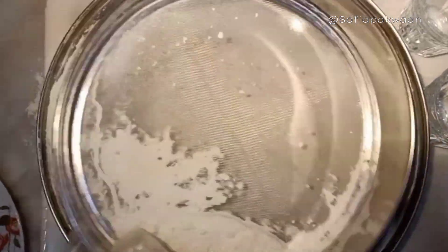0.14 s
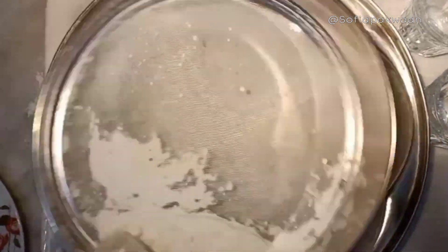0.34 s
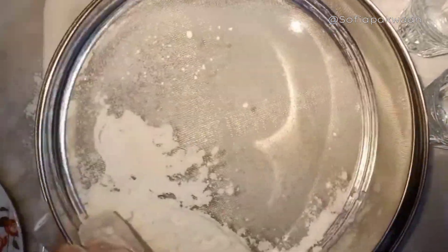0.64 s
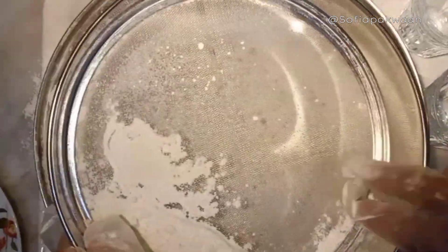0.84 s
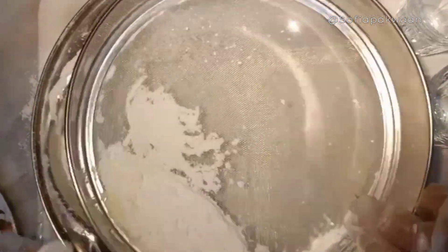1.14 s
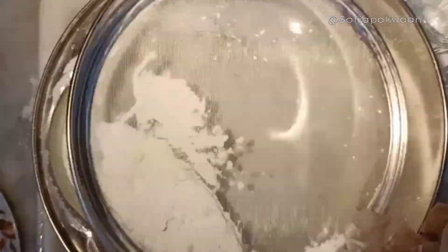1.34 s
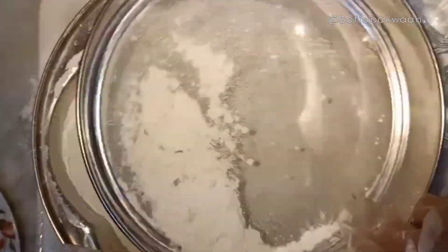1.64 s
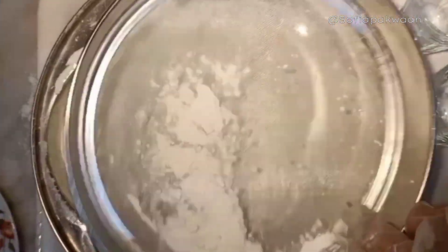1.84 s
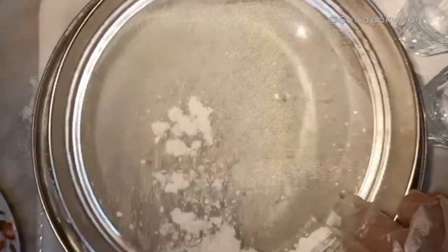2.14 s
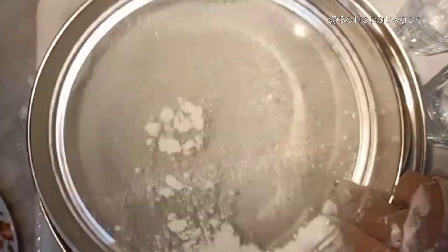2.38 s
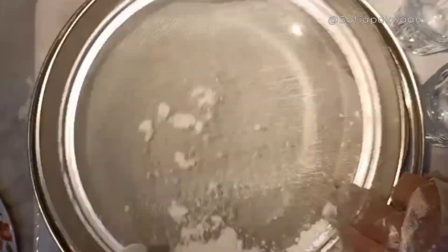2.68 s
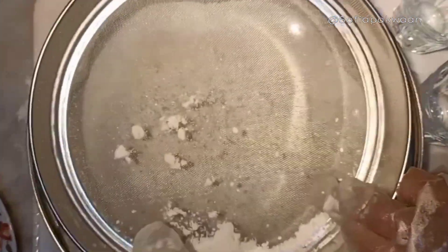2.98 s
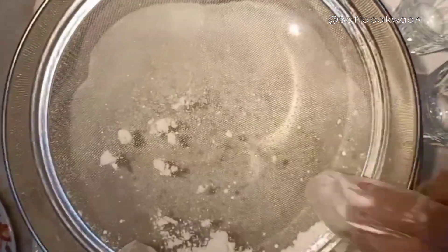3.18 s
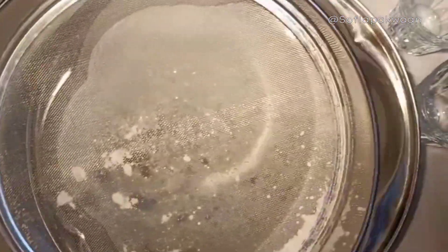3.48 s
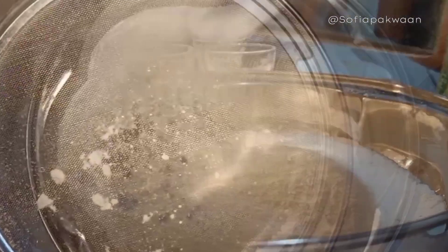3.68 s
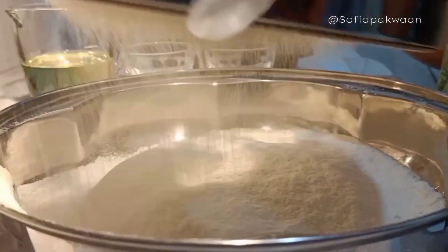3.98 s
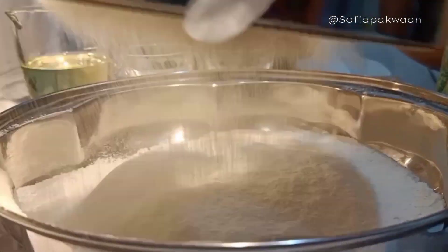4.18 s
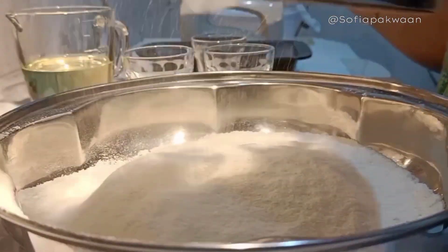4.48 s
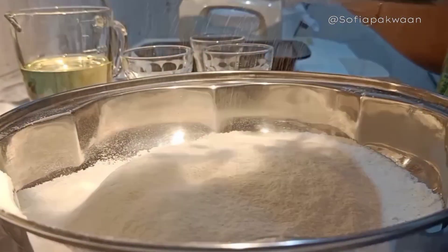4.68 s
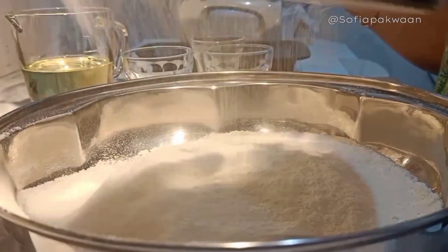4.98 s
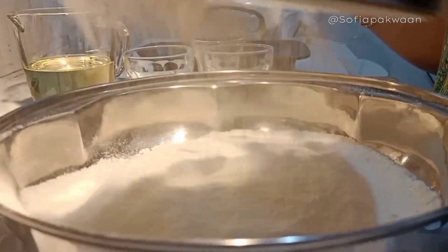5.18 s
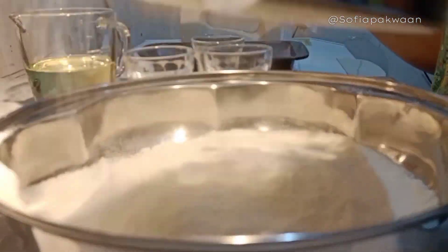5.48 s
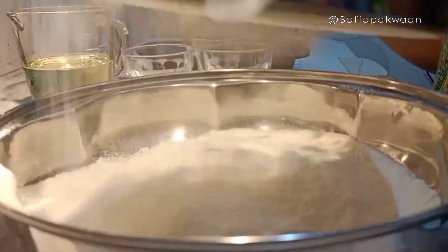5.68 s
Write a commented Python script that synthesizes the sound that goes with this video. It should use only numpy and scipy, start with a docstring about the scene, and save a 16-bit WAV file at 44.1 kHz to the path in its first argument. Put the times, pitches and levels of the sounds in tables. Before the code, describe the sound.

Close recording in a small hard-walled kitchen: flour sifting with a dry, bright, pulsing hiss, tiny metallic ticks and brief dull finger scuffs. The steel rim strikes the bowl softly at first, then loudly just after one second, again near two, and last at two and three-quarters. Then the sifting turns distant and much quieter, soft quick puffs over a low hum.

```python
"""A steel flour sieve is shaken over a steel bowl: its rim knocks the bowl and both ring in decaying modes.
Flour hisses across the mesh, as noise coloured by broad rings that swells with each stroke.
Lumps tick as short ringing scrapes and fingers shift on the rim as clumpy friction noise.
A small hard-walled kitchen answers knocks and ticks with sparse reflections;
under it all lie lumpy low room noise, fuzzy low tones and a wavering appliance hum."""
import sys
import numpy as np
from scipy import signal
from scipy.fft import rfft, irfft
from scipy.io import wavfile
from scipy.ndimage import uniform_filter1d

SR = 44100
rng = np.random.default_rng(int(sys.argv[2]) if len(sys.argv) > 2 else 0)


def generate_wav(sig):
    """Save sig (samples, or channels by samples) to the path in sys.argv[1] as 16-bit PCM at SR."""
    pcm = np.round(np.clip(np.atleast_2d(sig).T, -1, 1) * 32767).astype(np.int16)
    wavfile.write(sys.argv[1], SR, pcm)


def voltage_ratio(decibels):
    """Convert decibels (scalar or array-like) to amplitude ratios, 20 dB per decade."""
    exponent = np.asarray(decibels, float) / 20
    return 10 ** exponent


N = 257103  # length in samples

# spectrum of the kitchen background: frequency_hz, relative_density_db
AIR_SPECTRUM = [(24, -44), (40, -15.5), (64, -16.5), (85, -26), (118, 11.5), (140, -4.5), (206, -6.5),
                (304, -5.5), (596, -18.5), (897, -18), (1420, -24.5), (2200, -25.5), (3500, -20.5),
                (4700, -50), (15800, -73.5)]
# level of the kitchen background: time_s, level_db
AIR_LEVEL = [(0, -50.5), (.45, -67.5), (.75, -65), (2.35, -61), (2.62, -67.5), (3.1, -61.5), (4.5, -67),
             (5.83, -67)]
# fuzzy low tones in the room noise: pitch_hz, level_against_noise_db, width_hz
DRONE_TONES = [(118.6, -10.5, 2.7), (145, -9.5, 11)]
# repeating waver of the hum, before its slow sag: share_of_cycle, level_db
HUM_WAVER = [(0, -87.5), (0.102, -71.5), (0.221, -60.5), (.58, -79.5), (.78, -66.5), (1, -84)]
HUM_HZ, HUM_CYCLE_S, HUM_START_S, HUM_SAG_DB_PER_S = 57, 2.04, 0.53, 1.35
# low rumble after each blow, relative to the blow's low part
BOOM_DB, BOOM_RISE_S, BOOM_FALL_S = -28.5, 0.01, 0.02

# reverberation of the kitchen: frequency_hz, t60_s
KITCHEN_DECAY = [(250, 0.23), (800, 0.43), (2000, 0.54), (4000, 0.46), (7000, 0.44), (12000, 0.42)]
# microphone colour for close, sharp sounds: frequency_hz, gain_db
MIC_COLOUR = [(60, -42.5), (200, -10), (450, -1), (1000, -4.5), (7000, 0), (9000, -13), (12000, -23.5),
              (15400, -23)]

# fingers shifting their grip on the rim: peak_s, peak_level_db, fall_db_per_s
GRIP_SHIFTS = [(0.794, -58.5, 504), (.862, -60, 103), (1.0, -54.5, 200), (2.274, -55, 500),
               (2.444, -63.5, 298), (2.68, -73, 200)]
# spectrum of skin on steel: frequency_hz, relative_density_db
GRIP_SPECTRUM = [(250, -24), (550, -1), (1300, -2), (2200, -19.5), (5000, -36)]
GRIP_RISE_DB_PER_S = 403

# lumps and fingers on mesh and rim: start_s, relative_peak_db, pitch_hz
LUMP_TICKS = [(0.5925, -47, 3100), (0.702, -34, 3800), (0.7332, -40.5, 3880), (0.8018, -35, 3226),
              (0.8562, -29.5, 6590), (0.8763, -38, 3050), (0.9065, -30.5, 3515), (0.9537, -37, 6750),
              (0.9787, -36, 3160), (1.0006, -33, 2490), (1.091, -35.5, 6300), (1.1124, -42, 2150),
              (3.113, -45.5, 2630), (3.168, -44.5, 3280), (3.2503, -37.5, 3380), (3.273, -42, 3110),
              (3.407, -49, 3524), (3.7811, -39.5, 3720)]

# bouts of shaking: first_stroke_s, last_stroke_s, stroke_interval_s, first_swell_db, last_swell_db
SHAKING_BOUTS = [(0.131, .6, .094, 4, 3.5), (1.6, 1.85, 0.081, 4.5, 6.5), (2.144, 2.56, 0.15, 4, 3),
                 (3.79, 4.185, 0.1, 8, 9), (4.289, 4.393, 0.091, 3, 3.5), (4.698, 5.192, 0.098, 6, 6.5),
                 (5.29, 5.4, .105, 4.5, 5.5), (5.584, 5.78, 0.0985, 5, 8.5)]
# single flicks of the sieve: centre_s, swell_db
FLICKS = [(3.119, 4.5), (3.275, 2), (3.587, 4.5), (3.713, 5), (4.505, 5), (4.59, 1), (5.14, 5.5)]
# brief dips of the hiss: centre_s, swell_db
HISS_DIPS = [(4.455, -6.5), (4.645, -8), (5.45, -4.5)]
# offset of every second stroke; random spread; time from a swell's centre to 1/e of its dB height
BACK_DB, UNEVEN_DB, SWELL_S = -0.5, 0.96, 0.023

# flour sliding on the mesh, before the swells: time_s, level_db, extra_body_below_4_khz_db
FLOUR_LEVEL = [(0, -56, 4), (0.6, -55.5, -3), (.68, -65.5, 0.5), (.85, -60, -2), (.92, -61, 5),
               (1.1, -59.5, 1), (1.15, -67, -5), (1.37, -57, 5), (1.43, -51, -2.5), (1.9, -54, -2.5),
               (2.7, -53, -2), (2.85, -52, 5.5), (3.1, -70, 4.5), (3.35, -73, -2.5), (3.45, -84, 10),
               (3.74, -80, 3), (3.799, -72.5, 2), (4.6, -74, 0.5), (5.83, -71.5, -0.5)]
# spectrum of flour on mesh: frequency_hz, relative_density_db
MESH_SPECTRUM = [(530, -57), (900, -15.5), (1120, -15.5), (1680, -23.5), (2030, -4), (2620, -3.5),
                 (2950, 0.5), (4080, -9.5), (4540, -9.5), (6130, -8), (6740, -3.5), (7880, -15.5),
                 (9660, -25.5), (14000, -32), (15800, -30.5)]
# broad rings of the mesh: centre_hz, width_hz, boost_db
MESH_RINGS = [(2950, 170, 2), (4020, 300, 10.5), (6750, 840, 3)]
# fuller hiss around 5 kHz in the later, more distant shaking, one row: from_s, centre_hz, width_hz, boost_db
LATER_COLOUR = (3.2, 5350, 1800, 3)
# treble gain in dB per dB of flour level over the neutral level; blotchiness of the spectrum
BRIGHTER, NEUTRAL_DB, BLOTCH_DB = 0.4, -59.5, 1.6

# rim on bowl, clangs and dull bounces:
# start_s, below_1_khz_db, near_2_khz_db, near_4_khz_db, favoured_mode_hz
RIM_KNOCKS = [(0.0, -23.5, -27, -25, 3760), (0.01, -27.5, -21.5, -33, 1940), (.042, -17, -24, -27, 750),
              (0.051, -23, -22.5, -35.5, 1480), (0.057, -46, -48, -45, 932), (0.15, -23, -36, -31.5, 750),
              (.166, -44, -48, -56, 932), (0.159, -31, -28.5, -52, 1480), (1.14, -12.5, -9, -11.5, 1896),
              (1.165, -16.5, -12, -21, 820), (1.229, -25, -32, -29.5, 920),
              (1.579, -26.5, -26, -29.5, 1980), (1.708, -34, -46.5, -39, 750),
              (1.743, -41.5, -37, -42, 830), (1.943, -17.5, -12.5, -12.5, 2150),
              (1.959, -24, -20.5, -30, 2050), (1.974, -13.5, -19, -31.5, 840),
              (2.746, -18, -14.5, -17, 2050), (2.794, -29, -36, -38, 867)]
# modes of sieve and bowl, damped by hand and flour: pitch_hz, relative_level_db, t60_s (before further damping)
STEEL_MODES = [(297, -17.5, 0.15), (552, -9.5, 0.042), (620, -9.5, 0.057), (750, -4.5, 0.015),
               (818, -12, .42), (932, -2, 0.02), (1144, -11, 0.0539), (1215, -11.5, 0.05),
               (1370, -14, 0.18), (1480, -9, 0.02), (1679, -11, 0.18), (1964, -6.5, 0.025),
               (1980, -13.5, 0.013), (2050, -11.5, 0.18), (2171, -13, 0.14), (2282, -9, 0.026),
               (2450, -9.5, 0.02), (2634, -10, 0.047), (2704, -13, 0.07), (2962, -7, 0.1),
               (3273, -8.5, 0.082), (3650, -12, 0.034), (3880, -5, 0.05), (4266, -5.5, 0.015),
               (4250, -4.5, 0.043), (4770, -13, 0.067), (5523, -24, 0.031), (5450, -8.5, 0.024),
               (6350, -2.5, .04), (6936, 1.5, 0.034), (6960, -8.5, 0.024)]
TOP_DROP_DB = 14  # a blow's colour at 6500 Hz and above lies this far under that at 3500 Hz
OFF_SPOT_DB = -10  # long-ringing modes lose up to this much away from the struck spot
SPOT_LONGER = 0.92  # a short mode at the struck spot rings this share longer

EDGE_HZ = 15550  # upper band limit


def evened(x):
    """Normalization: scales a signal to rms 1."""
    return x / np.sqrt(np.mean(x ** 2) + 1e-20)


def read(points, hz):
    """Interpolation: reads a curve on a log-frequency axis."""
    f, value = np.transpose(points)
    return np.interp(np.log(hz + 1), np.log(f + 1), value)


def add(mix, s, sound):
    """Superposition: mixes a sound in at time s."""
    part = mix[max(round(s * SR), 0):][:len(sound)]
    part += sound[:len(part)]


def shaped(x, size, field_db):
    """Time-varying filtering: colours x by a dB field over frequency and time."""
    overlap = size * 3 // 4
    hz, t, z = signal.stft(x, SR, nperseg=size, noverlap=overlap)
    z = z * voltage_ratio(field_db(hz[:, None], t))
    return signal.istft(z, SR, nperseg=size, noverlap=overlap)[1][:len(x)]


def band_rms(x, lo_hz, hi_hz):
    """Parseval's theorem: rms of one band from its spectral energy."""
    z, hz = rfft(x), np.fft.rfftfreq(len(x), 1 / SR)
    band = z[(hz > lo_hz) & (hz < hi_hz)]
    return np.sqrt(2 * np.sum(abs(band) ** 2)) / len(x)


def patches(bins, frames, tall, wide):
    """Correlated randomness: smoothed noise gives blotches over frequency and time, rms 1."""
    noise = rng.standard_normal((frames, bins)).T
    return evened(uniform_filter1d(uniform_filter1d(noise, tall, 0), wide, 1))


def causal(points):
    """Minimum phase: folding the cepstrum gives a causal impulse response of a spectrum."""
    cepstrum = irfft(np.log(voltage_ratio(read(points, np.fft.rfftfreq(2048, 1 / SR)))))
    cepstrum[1:1024] *= 2
    cepstrum[1025:] = 0
    return irfft(np.exp(rfft(cepstrum)))


def drones(t):
    """Narrow-band noise: tones whose strength and phase wander at random."""
    out, f = np.zeros(N), np.fft.fftfreq(N, 1 / SR)
    for hz, db, width in DRONE_TONES:
        a, b = rng.standard_normal((2, N))
        wander = np.fft.ifft((a + 1j * b) * np.exp(-(2 * f / width) ** 2))
        tone = (wander * np.exp(2j * np.pi * hz * t)).real
        out += voltage_ratio(db) * evened(tone)
    return out


def booms():
    """Transient envelope: a low rumble rises and falls with the low part of each blow."""
    out, t = np.zeros(N), np.arange(SR // 2) / SR
    for s, low_db, *_ in RIM_KNOCKS:
        rise = 1 - np.exp(-t / BOOM_RISE_S)
        add(out, s, voltage_ratio(low_db + BOOM_DB) * rise * np.exp(-t / BOOM_FALL_S))
    return out


def hum(t):
    """Amplitude modulation: one low sine wavers in a repeating pattern and slowly sags."""
    cycle = (t - HUM_START_S) / HUM_CYCLE_S % 1
    level_db = np.interp(cycle, *np.transpose(HUM_WAVER)) - HUM_SAG_DB_PER_S * t
    return np.sqrt(2) * voltage_ratio(level_db) * np.sin(2 * np.pi * HUM_HZ * t)


def background():
    """Filtered noise: lumpy low room sound that booms after each blow, with drones and hum."""
    t = np.arange(N) / SR

    def field_db(hz, u):
        return read(AIR_SPECTRUM, hz) + 3.5 * patches(len(hz), len(u), tall=5, wide=6)
    noise = shaped(rng.standard_normal(N), size=2048, field_db=field_db)
    noise = noise / band_rms(noise, 64, 270) + drones(t)
    level = voltage_ratio(np.interp(t, *np.transpose(AIR_LEVEL))) + booms()
    return noise * level + hum(t)


def kitchen(x):
    """Reverberation: sparse reflections of random sign, each band dying at its own speed."""
    taps = np.zeros(SR)
    at = np.arange(300, SR - 20, 20) + rng.integers(0, 20, (SR - 301) // 20)
    taps[at] = rng.choice([-1., 1.], len(at))
    tail = shaped(taps, size=256, field_db=lambda hz, t: -60 * t / read(KITCHEN_DECAY, hz))
    return signal.fftconvolve(x, tail / np.linalg.norm(tail))[:N]


def clumpy(spread_db):
    """Intermittency: noise whose samples vary in strength by a capped exponential draw in dB."""
    return rng.standard_normal(N) * voltage_ratio(spread_db * np.minimum(rng.exponential(1, N), 5))


def grip():
    """Friction: clumpy dull noise of skin on steel, rising and falling with each shift."""
    def field_db(hz, t):
        return read(GRIP_SPECTRUM, hz) + 3.2 * patches(len(hz), len(t), tall=3, wide=8)
    rub, t = evened(shaped(clumpy(2.6), size=512, field_db=field_db)), np.arange(N) / SR
    level = np.zeros(N)
    for s, db, fall in GRIP_SHIFTS:
        level += voltage_ratio(db - np.maximum(GRIP_RISE_DB_PER_S * (s - t), fall * (t - s)))
    return rub * level


def ticks():
    """Resonance: a short gritty scrape excites a damped ring near one pitch."""
    t, out = np.arange(500) / SR, np.zeros(N)
    for s, peak_db, hz in LUMP_TICKS:
        grit = rng.standard_normal(500) * np.exp(-t / 0.0022)
        ring = np.sin(2 * np.pi * hz * t) * np.exp(-t * hz / 3.0)
        scrape = signal.fftconvolve(grit, ring)
        add(out, s - 0.0004, voltage_ratio(peak_db - 1.5) * scrape / abs(scrape).max())
    return out


def strokes():
    """Periodic forcing: time and swell of each stroke, forth and back, then single flicks and dips."""
    rows = []
    for first, last, step, first_db, last_db in SHAKING_BOUTS:
        at = np.arange(first, last + step / 2, step)
        db = np.interp(at, [first, last], [first_db, last_db])
        db += BACK_DB * (np.arange(len(at)) % 2)
        db += UNEVEN_DB * rng.standard_normal(len(at))
        rows += zip(at, db)
    return rows + list(FLICKS) + list(HISS_DIPS)


def sifting():
    """Granular friction: dense random grains scrape the mesh, which colours them with broad rings."""
    s, level_db, body_db = np.transpose(FLOUR_LEVEL)

    def field_db(hz, t):
        rings = sum(db / (1 + ((hz - f) / w * 2) ** 2) for f, w, db in MESH_RINGS)
        treble = np.clip((hz - 7800) / 2000, 0, 1)
        air = BRIGHTER * (np.interp(t, s, level_db) - NEUTRAL_DB) * treble
        body = np.interp(t, s, body_db) * np.clip((4200 - hz) / 1500, 0, 1)
        since, mid_hz, width, mid_db = LATER_COLOUR
        later = mid_db * (t > since) * np.exp(-((hz - mid_hz) / width) ** 2)
        blotches = BLOTCH_DB * patches(len(hz), len(t), tall=3, wide=24)
        return read(MESH_SPECTRUM, hz) + rings + air + body + later + blotches
    hiss, t = shaped(clumpy(2.2), size=256, field_db=field_db), np.arange(N) / SR
    swell_db = sum(db * np.exp(-((t - at) / SWELL_S) ** 2) for at, db in strokes())
    return hiss / band_rms(hiss, 4500, 8000) * voltage_ratio(np.interp(t, s, level_db) + swell_db)


def knocks():
    """Modal synthesis: blows ring the modes, favouring the struck spot's; the loose rim's buzz roughens them."""
    hz, db, t60 = np.transpose(STEEL_MODES)[:, :, None]
    t, out = np.arange(SR // 3) / SR, np.zeros(N)
    # all but the longest rings are damped more at high pitch
    t60 = np.where(t60 > 0.2, t60, np.minimum(t60, 0.018 + 110 / (hz + 1000)))
    rough = 0.035 / t60 * np.minimum(t / 0.008, 1)
    for s, low_db, mid_db, upper_db, spot_hz in RIM_KNOCKS:
        odds = rng.standard_normal((len(STEEL_MODES), 70, 2))
        high_db = upper_db - TOP_DROP_DB
        colour = [(900, low_db), (2000, mid_db), (3500, upper_db), (6500, high_db)]
        near = np.exp(-(np.log(hz / spot_hz) / 0.06) ** 2)
        # a long ring needs a blow near its spot
        favour_db = np.where(t60 < 0.2, 6 * near, OFF_SPOT_DB * (1 - near))
        spot_t60 = t60 * (1 + SPOT_LONGER * near * (t60 < 0.1))
        fade = voltage_ratio(-60 * t / spot_t60) * np.minimum(t / 0.0015, 1)
        buzz = 1 + rough * signal.resample(odds[..., 0] + 1j * odds[..., 1], len(t), axis=1)
        jitter_s = 0.0002 * odds[:, :1, 0]  # random starting phase of each mode
        modes = fade * (buzz * np.exp(2j * np.pi * hz * (t + jitter_s))).imag
        sound = (voltage_ratio(db + read(colour, hz) + favour_db) * modes).sum(0)
        # steel on steel: a noise crack stands for small modes too many to tell apart
        u = t[:800]
        crack = rng.standard_normal(800) * np.exp(-u / 0.009) * np.minimum(u / 0.00018, 1)
        tone = causal([(300, low_db - 10.5)] + colour + [(15000, high_db)])
        add(sound, 0, voltage_ratio(3.5) * signal.fftconvolve(crack, tone))
        add(out, s - 0.0004, sound)
    return out


def scene():
    """Superposition: knocks and ticks with their reverberation, over hiss, grip and room sound."""
    blows, lumps = knocks(), ticks()
    sharp = blows + lumps + kitchen(voltage_ratio(-4.5) * blows + voltage_ratio(-7) * lumps)
    sharp = signal.oaconvolve(sharp, causal(MIC_COLOUR))[:N]
    return (sharp + sifting() + background() + grip())[None]


def roll_off(x):
    """The treble ends steeply here."""
    return signal.sosfilt(signal.butter(12, 16450, fs=SR, output="sos"), x)


def record(dry):
    """Band limiting: a linear-phase lowpass removes the extreme treble of the finished mix."""
    edge = signal.firwin(255, EDGE_HZ, window=("kaiser", 9), fs=SR)
    mix = signal.oaconvolve(dry, edge[None], "same")
    return roll_off(mix)


dry = scene()
out = record(dry)
generate_wav(out)
```